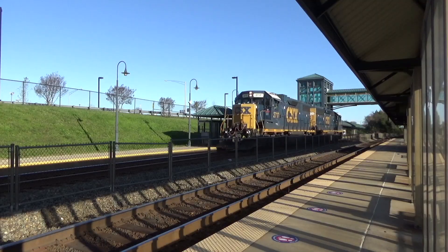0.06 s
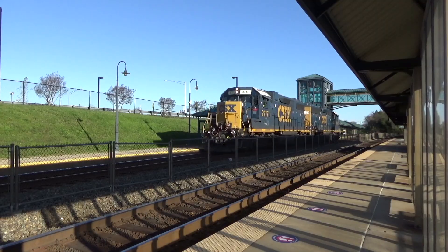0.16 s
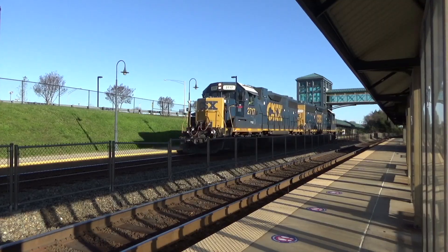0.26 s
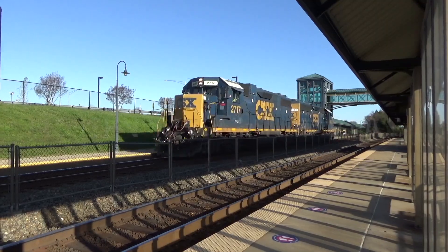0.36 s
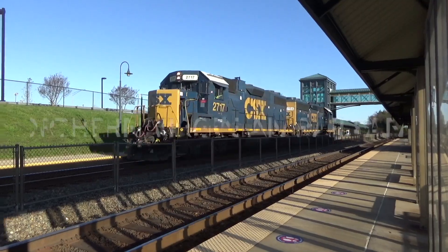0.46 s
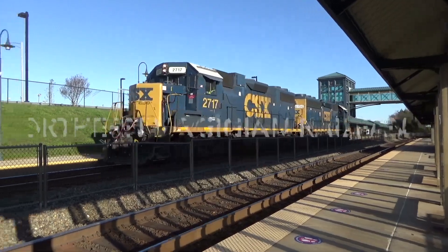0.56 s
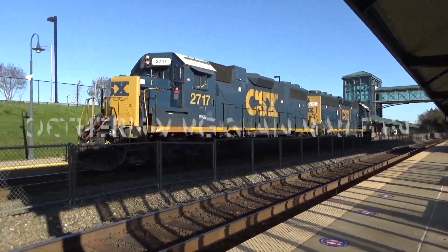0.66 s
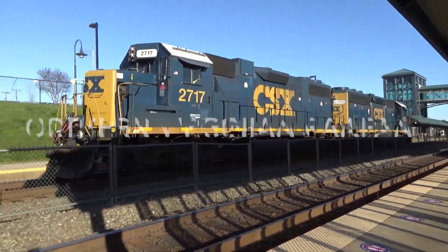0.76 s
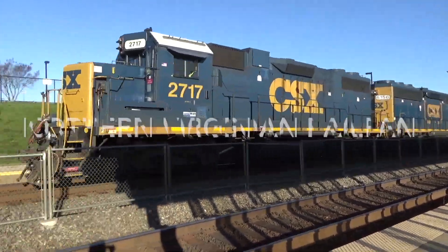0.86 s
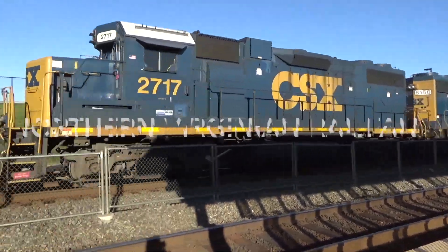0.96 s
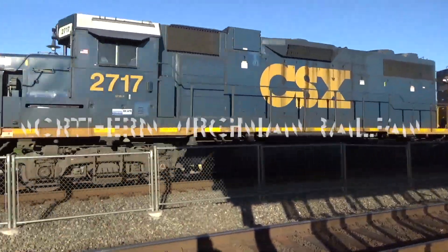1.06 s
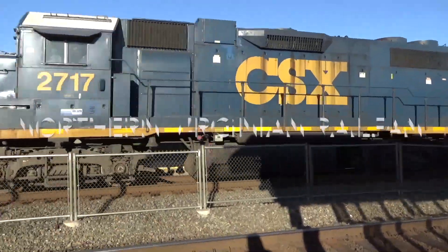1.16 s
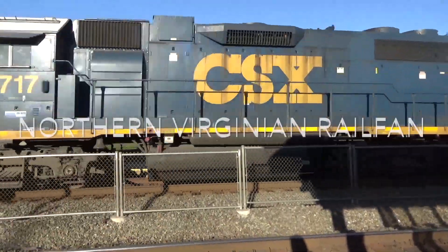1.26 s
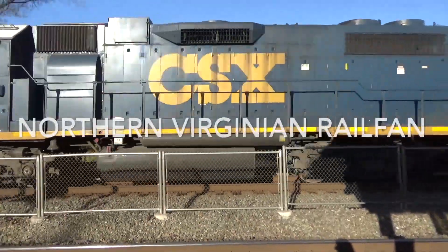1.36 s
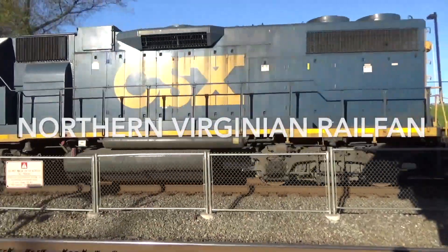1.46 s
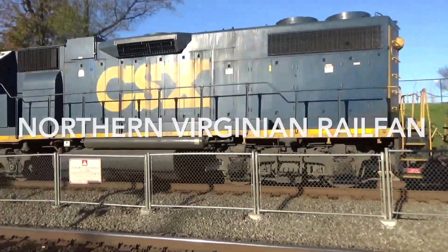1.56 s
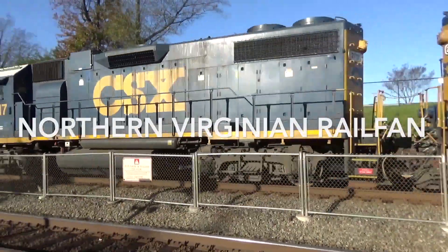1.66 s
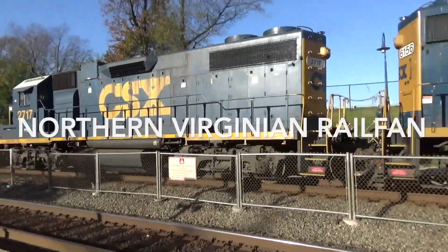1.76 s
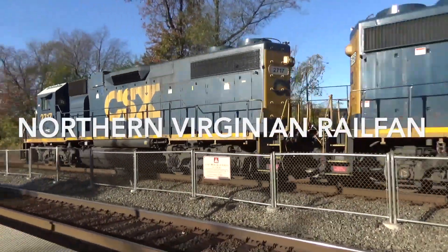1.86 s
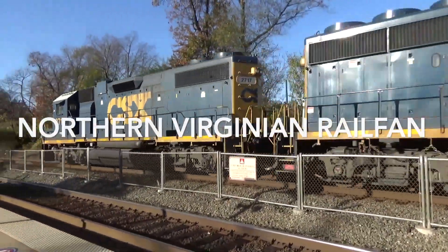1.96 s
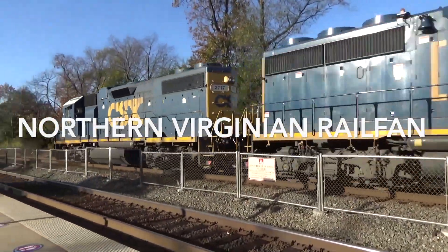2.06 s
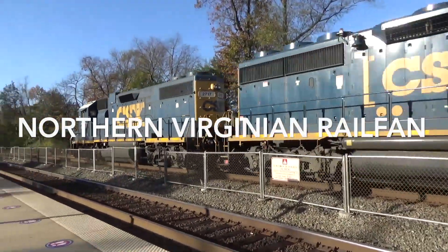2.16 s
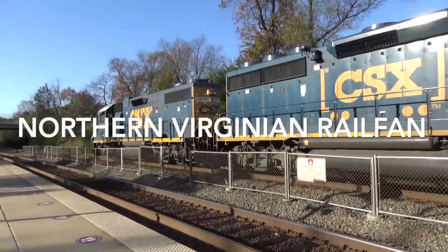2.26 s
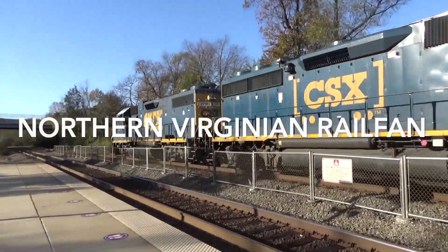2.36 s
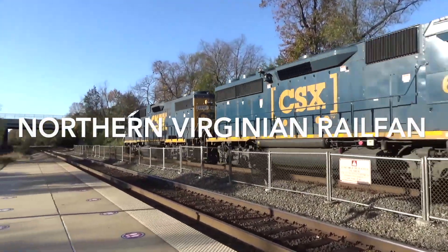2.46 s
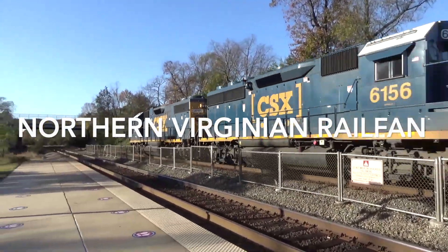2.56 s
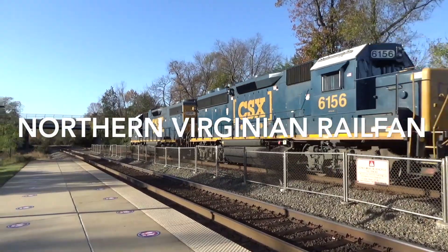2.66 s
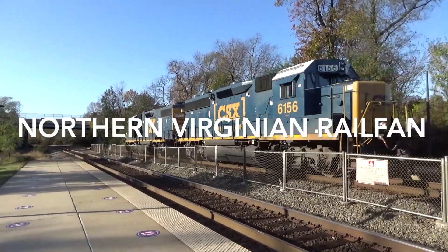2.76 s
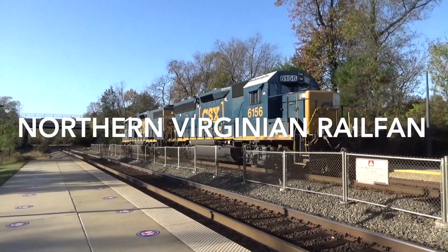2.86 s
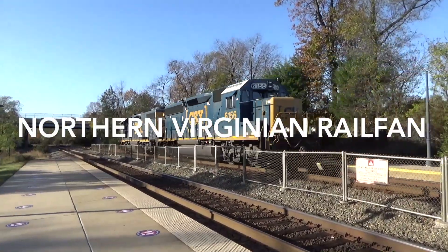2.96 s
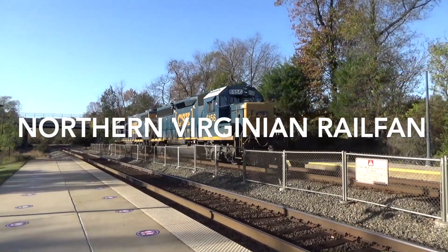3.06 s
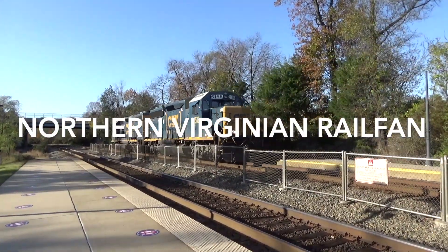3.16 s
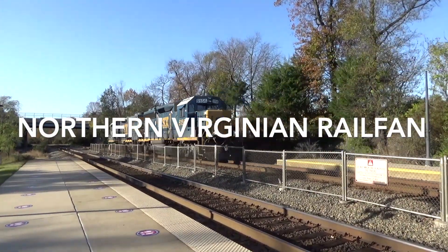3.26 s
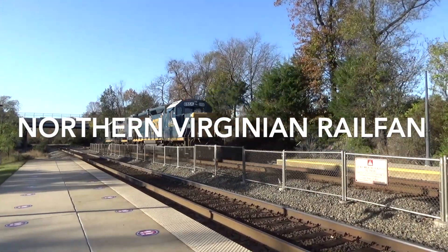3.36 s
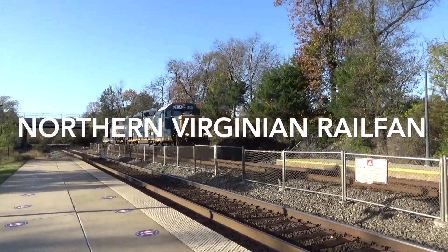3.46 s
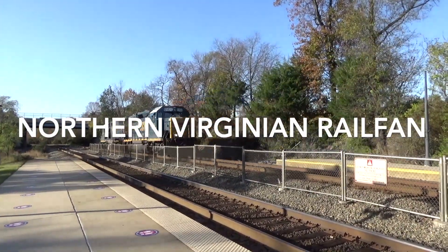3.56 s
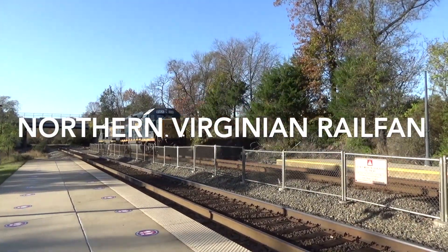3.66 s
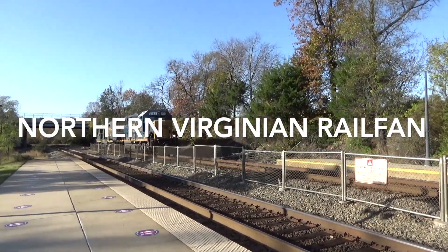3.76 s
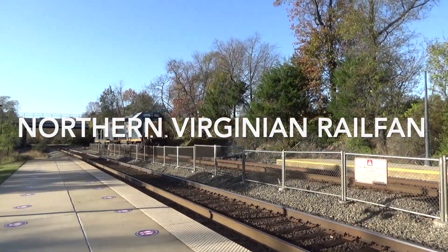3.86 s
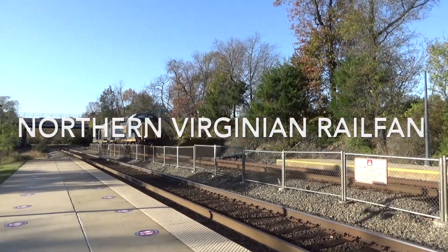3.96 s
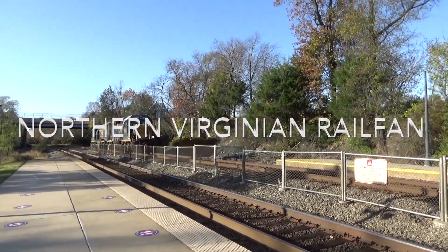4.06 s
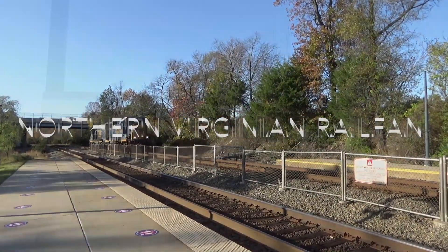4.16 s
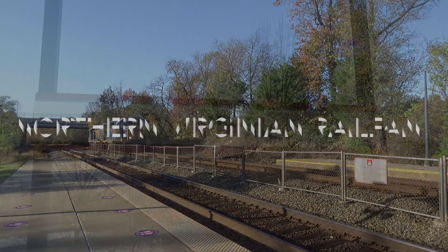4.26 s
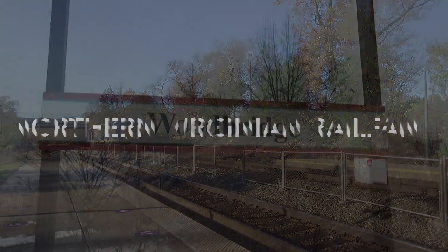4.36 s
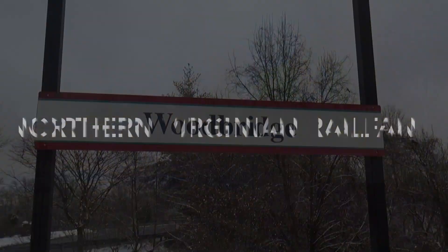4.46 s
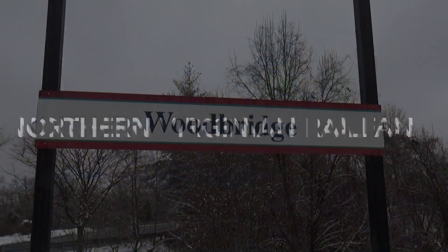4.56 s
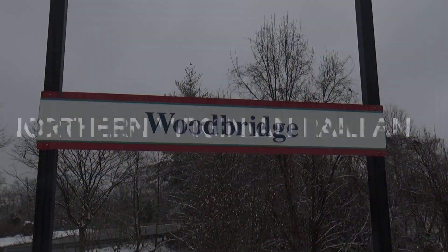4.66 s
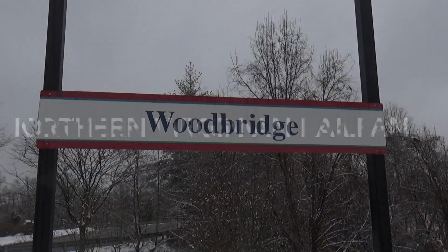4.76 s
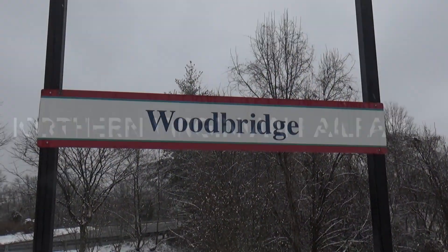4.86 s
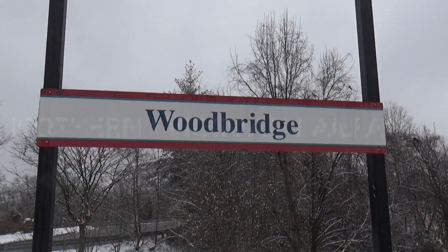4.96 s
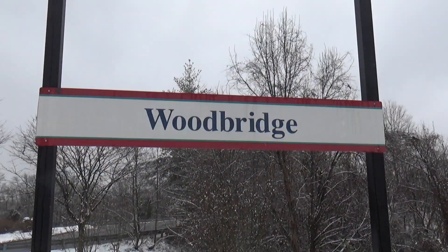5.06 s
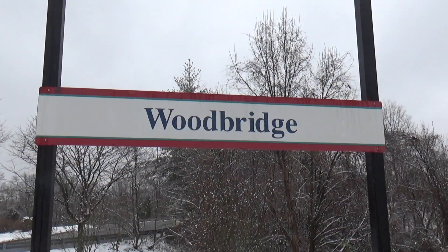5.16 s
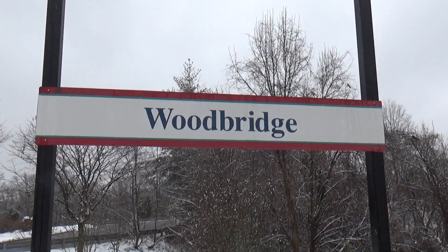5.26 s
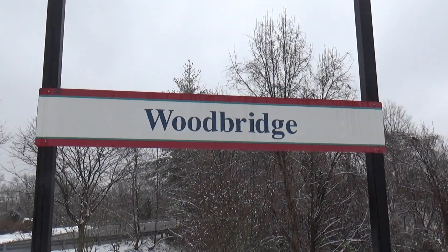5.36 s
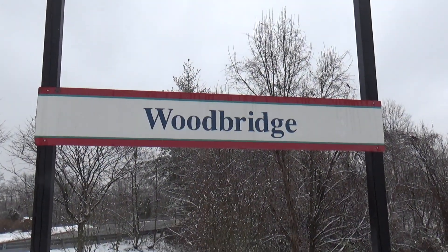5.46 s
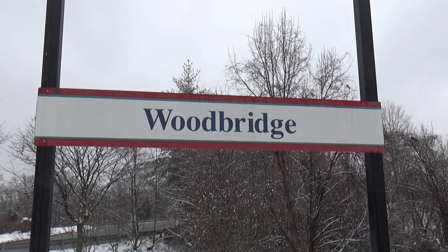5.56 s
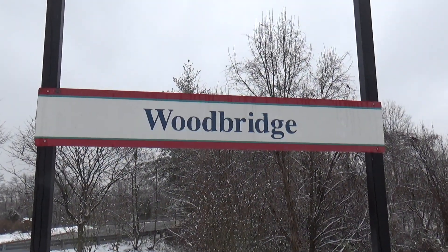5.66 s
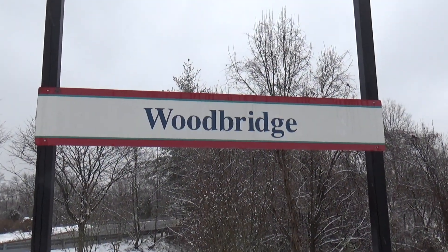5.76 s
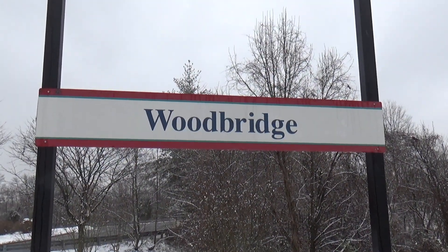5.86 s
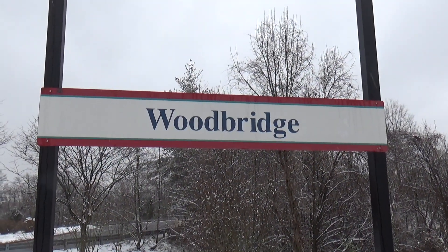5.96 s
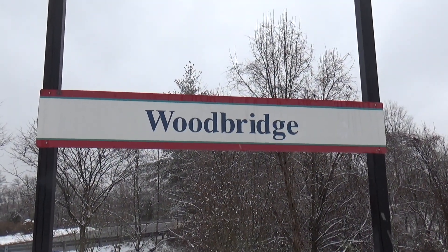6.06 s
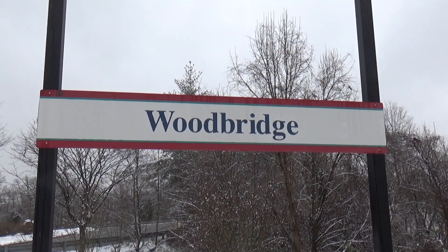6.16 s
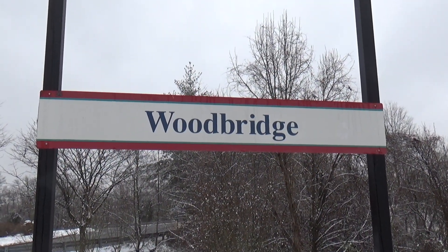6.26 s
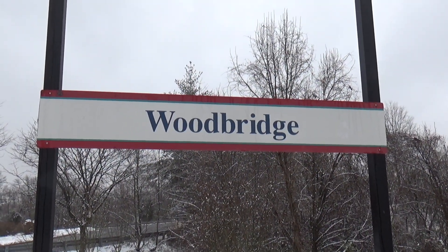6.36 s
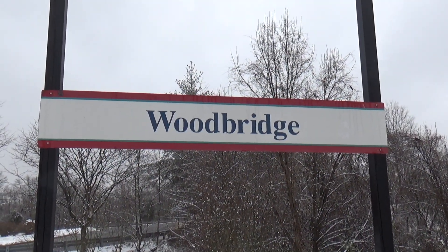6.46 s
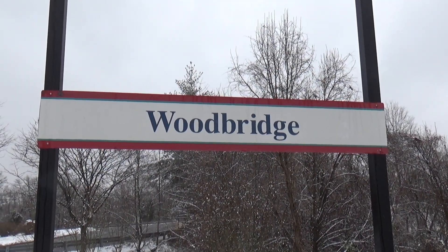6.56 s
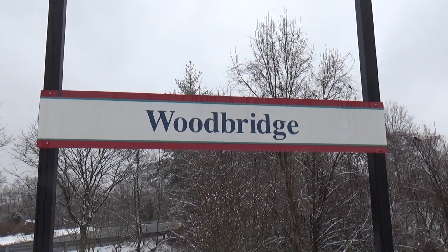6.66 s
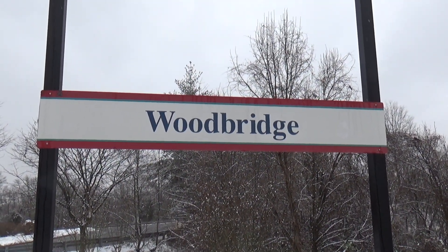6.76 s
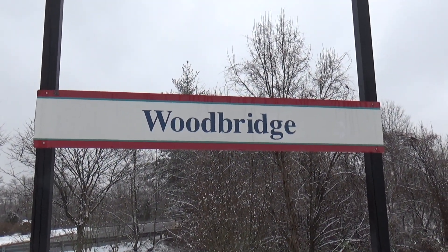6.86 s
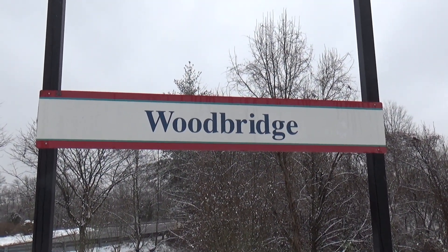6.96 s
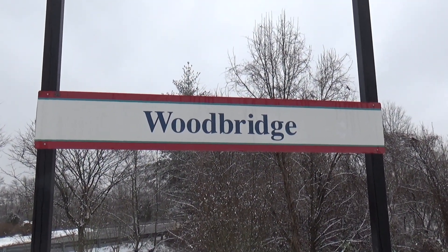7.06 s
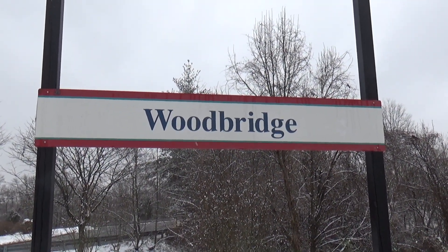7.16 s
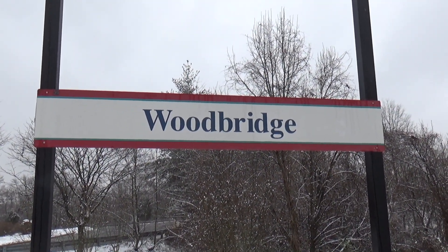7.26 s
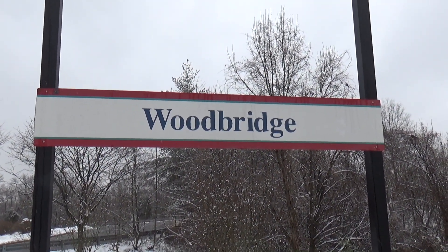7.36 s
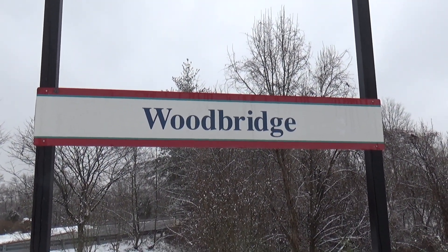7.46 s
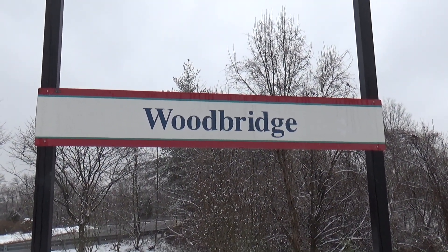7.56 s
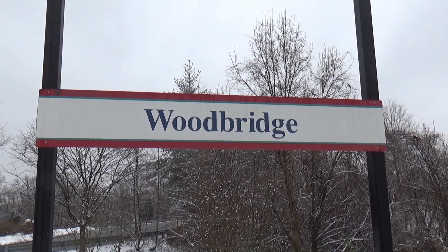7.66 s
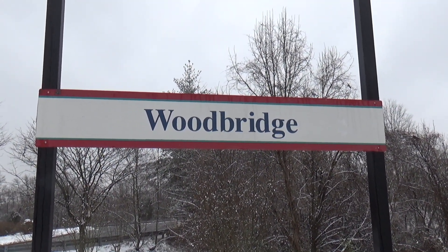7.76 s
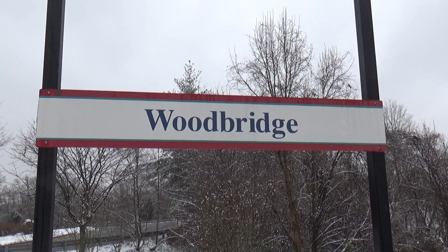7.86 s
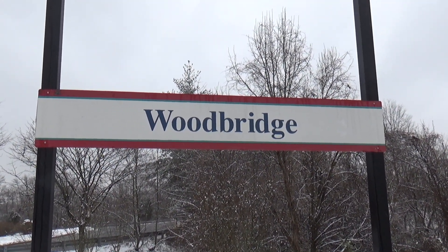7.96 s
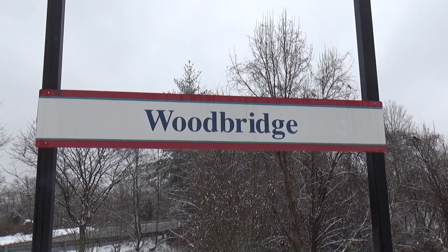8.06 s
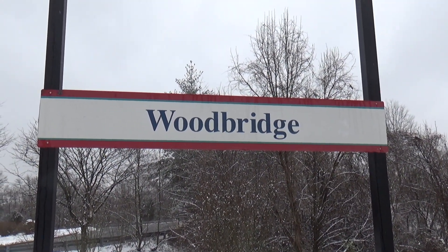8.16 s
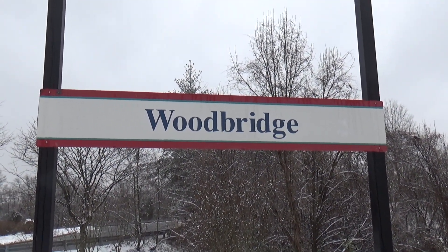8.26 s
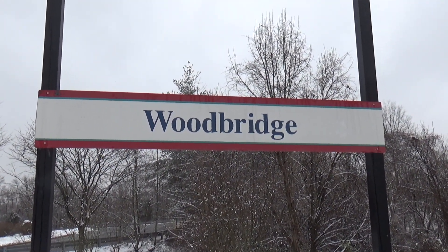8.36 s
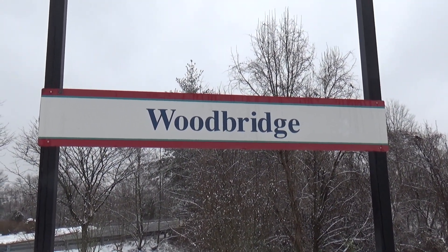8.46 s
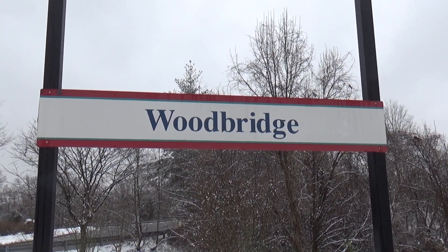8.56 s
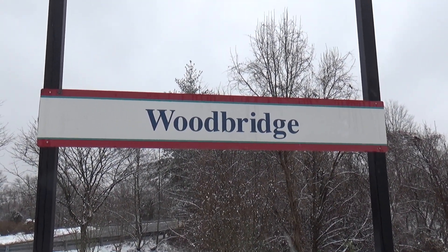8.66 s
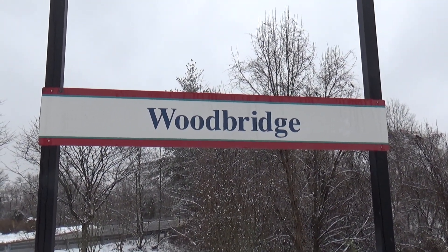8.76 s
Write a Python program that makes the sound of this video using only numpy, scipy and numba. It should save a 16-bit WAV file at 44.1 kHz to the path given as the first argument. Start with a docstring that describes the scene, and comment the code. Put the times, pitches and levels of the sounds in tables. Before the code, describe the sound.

A loud train pass with ringing bell and rapid wheel thumps fades into a calm winter platform, distant vehicle and sharp icy ticks.

```python
"""Train pass, then winter platform.

Diesel locomotives pass at speed: roar from noise bands, a struck bell of beating modes that drops in pitch,
flat-spot thumps from ringing noise, a casing drone of narrow noise and one puff of air.
This fades over to wet road hiss from noise bands and a distant vehicle changing gear, from engine orders.
Sleet grains, clicks with short rattling rings, tick on the microphone housing."""
import sys
import numpy as np
from scipy import signal
from scipy.fft import rfft, irfft, next_fast_len
from scipy.io import wavfile
from scipy.ndimage import uniform_filter1d
from numba import njit

SR = 44100
rng = np.random.default_rng(int(sys.argv[2]) if len(sys.argv) > 2 else 0)


def output_pcm(signal):
    """Save a mono or channel-first signal as 16-bit PCM at the path in sys.argv[1].

    Samples are clipped to [-1, 1] before scaling.
    """
    pcm = np.clip(np.atleast_2d(signal).T, -1, 1) * 32767
    wavfile.write(sys.argv[1], SR, np.round(pcm).astype(np.int16))


N = 388521
T = np.arange(N) / SR
MID_SIDE = np.array([[1], [-1]])  # sign of the side signal in left and right


def undb(db):
    """Gain of a dB value."""
    return 10 ** (np.asarray(db) / 20)


def curves(table):
    """Columns of a time table, interpolated to one value per sample."""
    s, *columns = np.transpose(table)
    return [np.interp(T, s, c) for c in columns]


def at_hz(table, hz):
    """Value of a spectrum table, interpolated over log frequency."""
    f, v = np.transpose(table)
    return np.interp(np.log(hz), np.log(f), v)


def panned(x, pan_db):
    """Two channels with a level difference, left minus right."""
    return np.array([x * undb(pan_db / 2), x * undb(-pan_db / 2)])


def filtered(x, order, hz, kind="low"):
    """Butterworth filter."""
    return signal.sosfilt(signal.butter(order, hz, kind, fs=SR, output="sos"), x)


@njit
def svf(x, hz, width_hz):
    """State-variable band-pass with a moving centre, gain 1 there."""
    y, b, l = np.empty(len(x)), 0., 0.
    for i in range(len(x)):
        g, k = np.tan(np.pi * hz[i] / SR), width_hz / hz[i]
        v = (b + g * (x[i] - l)) / (1 + g * (g + k))
        b, l, y[i] = 2 * v - b, l + 2 * g * v, k * v
    return y


def even(x, size):
    """Narrow noise with its slow chance swells levelled out; rms 1."""
    return x / np.sqrt(uniform_filter1d(x ** 2, size) + 1e-9)


def walk(rate_hz):
    """Random levels held for 1 / rate_hz and slewed; spread near 1."""
    k = int(SR / rate_hz)
    steps = np.repeat(rng.standard_normal(N // k + 1), k)
    return 1.56 * uniform_filter1d(uniform_filter1d(steps, k), k)[:N]


# Directional split of the two microphone ports. Each row: frequency in Hz, share of the level difference (0-1).
PORT_SHARE = [(80, 0.05), (250, 0.38), (600, 0.97), (1500, 0.82), (4000, 0.57), (10000, 0.044)]


def noise_bands(colour, side, lead, move_db, pan_db, widen, flicker_db, flicker_hz):
    """Half-octave spaced noise bands in mid and side, each moved by move_db(hz) and flickering alone."""
    size = next_fast_len(N)
    f = np.maximum(np.fft.rfftfreq(size, 1 / SR), 1)
    shape = undb(at_hz(colour, f))
    shape /= np.sqrt(np.mean(shape ** 2))  # mid rms near 1
    side_gain = undb(at_hz(side, f))
    pair = rfft(rng.standard_normal((2, size))) * shape * np.array([f ** 0, side_gain])
    out = np.zeros((2, N))
    for hz in 25 * 2 ** np.arange(0, 10, .5):
        # squared-cosine skirts of neighbouring bands add up to one
        skirt = np.cos(np.pi * np.clip(np.log2(f / hz), -.5, .5)) ** 2
        mid, wide = irfft(pair * skirt, size)[:, :N]
        wide = wide * undb(pan_db * widen(hz))
        gain = undb(move_db(hz) + flicker_db * walk(flicker_hz))
        lean = undb(pan_db * at_hz(PORT_SHARE, hz) / 2)
        out += [gain * lean * (mid + wide), gain / lean * (mid - wide)]
    turn = np.exp(.5j * at_hz(lead, f))
    return irfft(rfft(out, size) * [turn, 1 / turn], size)[:, :N]


# Course of the roar. Each row: time in s, level in dB before ROAR_LIFT_DB, then rumble, rail hiss, air hiss
# and top hiss in dB (their means are taken out), left minus right in dB.
ROAR_COURSE = [(0.0, -19.5, -6.5, -3, -11.5, -21, -3), (0.36, -17.5, -10.5, -4, -11, -22.5, -1),
               (0.75, -20, -9.5, -1, -6.5, -15.5, -1), (0.95, -19, -10.5, -1.5, -9, -22, -1.5),
               (1.42, -16.5, -12, -5, -11, -30, -3), (1.65, -18, -11.5, -5, -11.5, -31, -6),
               (2.2, -16.5, -14, -7, -15, -36.5, -7.5), (2.45, -19, -14.5, -3.5, -8.5, -31.5, -6.5),
               (2.71, -19.5, -11.5, -2.5, -10.5, -31, -4), (3.15, -21, -12, -2.5, -12, -27.5, -1.5),
               (3.8, -25.5, -11.5, -0.5, -11.5, -26, 0), (4.2, -25.5, -9, 0.5, -16, -25.5, 0.5),
               (4.6, -25, -8, 2, -12.5, -21, 0.5)]
# Centres of rumble, body, rail, air and top hiss. Each entry: frequency in Hz.
ROAR_ZONE_CENTRES = [170, 700, 2600, 7500, 13000]
# Mean spectrum. Each row: frequency in Hz, relative density in dB.
ROAR_SPECTRUM = [(15, -59), (25, -31), (102, -20.5), (212, -8), (394, -3), (451, -1.5), (659, -0.5),
                 (1130, -5), (1260, -8), (2550, -10.5), (3520, -14.5), (4250, -13.5), (6920, -20.5),
                 (8590, -19.5), (16000, -48.5)]
# Stereo width at zero lean. Each row: frequency in Hz, side minus mid in dB.
ROAR_WIDTH = [(60, -14), (110, -16), (200, -15.5), (380, -11.5), (700, -8.5), (1290, -9.5), (2380, -15),
              (4400, -42), (8120, -22.5), (11000, -40), (15000, -66)]
# Narrowing with direction. Each row: frequency in Hz, dB less side per dB of left minus right.
ROAR_NARROWING = [(400, 0), (1000, 0.5), (2000, 0.7), (4000, 3.5), (8000, 2.5), (12000, -4)]
# Phase between the ports. Each row: frequency in Hz, lead of the left in radians.
ROAR_PHASE = [(30, 0.0), (100, -0.25), (250, -0.46), (500, -0.36), (1000, -0.33), (2000, -0.1),
              (4000, 0.16)]
# Throb of the roar at the wheel-turn rate. Each row: time in s, depth in dB before its share.
THROB_DEPTH = [(2.2, 0.2), (2.9, 0.52), (3.5, 2.2), (4.0, 1.2), (4.6, .2)]
# Throb over the spectrum. Each row: frequency in Hz, share of the depth (0-1).
THROB_SPECTRUM = [(300, 0.05), (1500, 0.64), (5000, 0.54), (12000, 1)]
# Brief dip over the spectrum. Each row: frequency in Hz, share of DIP_DB (0-1).
DIP_SPECTRUM = [(400, 0.58), (1500, 1), (3200, .7), (7000, 0.59)]
DIP_FROM_S, DIP_TO_S, DIP_DB = .752, 0.826, -3.5  # under the nearest bell stroke
TURN_S, HIT_S, THROB_LAG_S = .1408, 3.710, 0.039  # wheel turn, one hit, hit to throb crest
ROAR_LIFT_DB = 2.0


def roar():
    """Wheels, rails, fans and exhaust: one wide roar that dulls just after passing, then brightens as it fades."""
    db, rumble, rail, air, top, pan_db = curves(ROAR_COURSE)
    zones = np.array([rumble, 0 * db, rail, air, top])
    zones -= zones[:, :3 * SR].mean(axis=1, keepdims=True)  # over 3 s; the spectrum holds the mean balance
    throb_db = curves(THROB_DEPTH)[0] * np.cos(2 * np.pi * (T - HIT_S - THROB_LAG_S) / TURN_S)
    dip_db = DIP_DB * uniform_filter1d(1. * (T > DIP_FROM_S) * (T < DIP_TO_S), size=600)

    def move_db(hz):
        share = [np.interp(np.log(hz), np.log(ROAR_ZONE_CENTRES), one) for one in np.eye(len(zones))]
        pulse_db = at_hz(THROB_SPECTRUM, hz) * throb_db
        return np.dot(share, zones) + pulse_db + at_hz(DIP_SPECTRUM, hz) * dip_db

    bands = noise_bands(ROAR_SPECTRUM, ROAR_WIDTH, ROAR_PHASE, move_db, pan_db,
                        lambda hz: -at_hz(ROAR_NARROWING, hz), flicker_db=1.1, flicker_hz=9.)
    return bands * undb(db + ROAR_LIFT_DB)


SPEED_M_S, GAP_M, ABREAST_S = 23., 9.8, 1.27  # train speed, distance to track, time abreast


def doppler():
    """Pitch ratio of a point on the train passing at steady speed; sound at 343 m/s."""
    along_m = SPEED_M_S * (T - ABREAST_S)
    return 1 / (1 + SPEED_M_S / 343 * along_m / np.hypot(along_m, GAP_M))


# Bell at rest, each mode a close pair that beats. Each row: frequency in Hz, level in dB, t60 in s,
# swell time constant in s, beat in Hz, time from blow to beat crest in s, beat depth (0-1).
BELL_MODES = [(1108, 9.5, 1.9, 0.13, 2.8, .18, .35), (2150, 8.5, 0.58, 0.018, 17., 0.037, .35),
              (2412, 4.5, 1.05, 0.03, 22, 0.0595, 0.55), (4040, 5.5, 0.63, 0.015, 18, 0.039, 0.2),
              (6060, 3, 0.53, 0.005, 25, 0.019, 0.27), (8030, -1, 0.5, 0.0033, 25., 0.011, 0.45)]
# Bell strokes. Each row: time in s, level in dB, dB per octave above the strike note,
# extra dB of the hum note below it, extra dB of the top modes.
BELL_STROKES = [(-.2, -19, -3, -10, 0), (.748, -21.5, 0, 0, 0), (1.672, -28.5, 5, 2, -10),
                (2.64, -29.5, -2.5, -3, 2), (3.6, -38, -2, -1, 3), (4.568, -24, -50, -9, 3)]
STRIKE_HZ, BELL_TOP_HZ = 2150, 5000


def bell(ratio):
    """Each stroke rings decaying, beating modes, shifted by the Doppler ratio."""
    out, turns = np.zeros(N), np.cumsum(ratio) / SR
    for hz, db, t60, swell, beat, crest, depth in BELL_MODES:
        ring = np.zeros(N)
        octaves = np.log2(max(hz / STRIKE_HZ, 1))
        for s, stroke_db, tilt_db, hum_db, top_db in BELL_STROKES:
            i = max(int(s * SR), 0)
            age = T[i:i + SR] - s
            pair = 1 + depth * np.cos(2 * np.pi * beat * (age - crest))
            level_db = stroke_db + db + tilt_db * octaves
            level_db += hum_db * (hz < STRIKE_HZ - 500) + top_db * (hz > BELL_TOP_HZ)
            rise = 1 - np.exp(-np.abs(age) / swell)
            ring[i:i + SR] += pair * undb(level_db - 60 * age / t60) * rise
        # reflections from ground and car body make every mode waver
        waver = undb(min(hz / 2500, 1.5) * walk(70.))
        out += ring * waver * np.sin(2 * np.pi * hz * turns + hz / 6000 * walk(160.))
    return out


# Flat-spot hits, one a wheel turn. Each row: time in s, level in dB, scrape in dB against that level,
# pitch of the ring as a ratio, extra dB of the upper ring.
FLAT_SPOT_HITS = [(2.161, -31, -17, 1., 2), (2.302, -18, -18, 1., -2), (2.443, -23, -19, 1., 0),
                  (2.584, -12, -22, 1., 2), (2.724, -11, -20, 0.97, 3), (2.865, -9.5, -15, 0.88, 4),
                  (3.006, -14, -13, 1.1, 7), (3.147, -12, -12, 0.97, 9), (3.288, -10, -11.5, 1.07, 4.5),
                  (3.422, -10.5, -7.5, 0.94, 6), (3.571, -8, -18, 1.02, -2), (3.708, -6.5, -11, 1.02, -5),
                  (3.847, -8, -18, 1.015, -7), (3.990, -8, -17, 1.02, -8), (4.132, -9.5, -22, 0.92, -9),
                  (4.273, -9.5, -18, 1.05, -3), (4.414, -11, -22, 0.92, -9), (4.555, -14, -21, 1, -6)]
# Wheel and rail ring. Each row: frequency in Hz, width in Hz, level in dB,
# delay in s (the peak comes 0.021 s after it), later return in dB.
WHEEL_MODES = [(606, 170, -0.5, 0.021, -7.5), (1042, 120, 2.5, 0.0085, -4.5),
               (2500, 1100, -5.5, 0.023, -20)]
THUMP_RISE_S, THUMP_FALL_S, RING_DB, SCRAPE_TOP_DB = 0.0098, 0.011, -8.5, -31
THUMP_SIDE_DB, THUMP_SIDE_HZ, THUMP_LEFT_DB = -9, 2000, -2


def thumps():
    """Each contact swells fast in every wheel mode, returns from the embankment and lifts a wide-band scrape."""
    age = np.arange(int(.2 * SR)) / SR
    times, hit_db = np.transpose(FLAT_SPOT_HITS)[:2]
    _, scrape_db, pitch, upper_db = curves(FLAT_SPOT_HITS)

    def blows(lag, return_db):
        shape = np.zeros(len(age))
        for at, db in [(lag + 0.021, 0), (lag + 0.067, return_db)]:
            slope = np.where(age < at, (age - at) / THUMP_RISE_S, (at - age) / THUMP_FALL_S)
            shape += undb(db) * np.exp(slope)
        out = np.zeros(N)
        for s, level_db in zip(times - .02, hit_db):  # the swell starts just before full contact
            i = int(s * SR)
            out[i:i + len(age)] += undb(level_db) * shape
        return out

    def ringing(hz, width_hz):
        return even(svf(rng.standard_normal(N), hz * pitch, 1. * width_hz), size=300)

    ring = np.zeros((2, N))
    for hz, width_hz, db, lag, return_db in WHEEL_MODES:
        # each knock rings wide below THUMP_SIDE_HZ
        side = undb(THUMP_SIDE_DB) * filtered(ringing(hz, width_hz), 3, THUMP_SIDE_HZ) * MID_SIDE
        level = undb(db + upper_db * (hz == WHEEL_MODES[-1][0]))
        ring += level * blows(lag, return_db) * (ringing(hz, width_hz) + side)
    ring = undb(RING_DB) * filtered(ring, 2, 5500)

    hiss = filtered(rng.standard_normal(N), 3, [1800, 9800], "band")
    edge = filtered(rng.standard_normal(N), 3, [8000, 9900], "band")
    scrape = undb(scrape_db) * uniform_filter1d(blows(0.019, -20.0), size=900) * hiss
    scrape_top = undb(SCRAPE_TOP_DB) * uniform_filter1d(blows(0.015, -18.0), size=900) * edge
    return ring + scrape + scrape_top


# Hollow drone of the engine casing. Each row: time in s, level in dB.
DRONE_COURSE = [(0, -26.5), (.35, -24.5), (.6, -33), (.9, -32), (1.15, -26), (1.4, -28), (1.9, -30.5),
                (2.6, -37.5), (3.2, -43)]
DRONE_HZ, DRONE_WIDTH_HZ = 452, 28  # at rest, per filter pass


def drone(ratio):
    """Engine noise rings one narrow resonance of the casing."""
    noise = rng.standard_normal(N)
    for _ in range(2):
        noise = svf(noise, DRONE_HZ * ratio, 1. * DRONE_WIDTH_HZ)
    return even(noise, size=4000) * undb(curves(DRONE_COURSE)[0])


PUFF_S, PUFF_HALF_S, PUFF_DB, PUFF_HZ, PUFF_WIDTH_HZ = .243, .014, -31, 8800, 2500


def puff():
    """One short hiss of compressed air: band-passed noise under a bell-shaped swell."""
    noise = rng.standard_normal(N)
    for _ in range(2):
        noise = svf(noise, np.full(N, 1. * PUFF_HZ), 1. * PUFF_WIDTH_HZ)
    swell = np.exp(-((T - PUFF_S) / PUFF_HALF_S) ** 2)
    return undb(PUFF_DB) * swell * noise * np.sqrt(2 * SR / PUFF_WIDTH_HZ)


# Loudest sleet grains. Each row: time in s, level in dB before the housing, ring in Hz, t60 in s,
# left minus right in dB, extra treble in dB.
LOUD_GRAINS = [(4.6334, -20.5, 8300, 0.004, 2, 1), (4.9899, -19.5, 4600, 0.004, -0.5, -1),
               (5.0651, -14.5, 5100, 0.015, 2, -3), (5.0772, -20, 8800, 0.005, -0.5, 2),
               (5.2615, -24, 8980, .004, 0, 0), (5.29, -14.5, 6000, 0.003, 5, -6),
               (5.403, -17.5, 6500, 0.003, 3, 3), (5.4426, -11.5, 6200, 0.005, 7, -14),
               (5.4925, -15, 4500, 0.012, -2, 6.5), (5.576, -18, 6300, 0.004, 5.5, -10),
               (5.7693, -24, 6000, 0.004, 0, 0), (6.0442, -26, 8000, 0.004, 0, 0),
               (6.1465, -16.5, 7100, 0.003, -0.5, -4), (6.2555, -26, 7870, 0.007, 0.0, 1),
               (6.3134, -23, 6500, 0.004, -0.5, -1), (6.6952, -28, 7800, 0.003, 4, 2),
               (6.7299, -20, 4380, 0.005, 3, -5), (6.8245, -21, 6000, 0.003, -1.0, -2),
               (7.0731, -25, 8100, 0.0033, 0.0, 0), (7.1169, -24, 8790, 0.003, 1.0, 0),
               (7.4173, -20, 5800, 0.0036, -0.5, -18), (7.4256, -20, 4000, 0.0039, -0.5, -15),
               (7.67, -18.5, 4300, 0.006, -0.5, -8), (7.7415, -25, 7340, 0.003, 0.5, 0),
               (8.0122, -26, 4600, 0.004, 0, -7), (8.0602, -18.5, 9500, 0.003, 2, 3),
               (8.089, -22, 7900, 0.003, 2, 0), (8.178, -27, 8000, 0.003, 0, 0),
               (8.3146, -17.5, 4200, 0.006, 4, -7), (8.3255, -21, 8000, 0.003, 0.5, 0),
               (8.6684, -21, 7500, 0.005, 1, 0)]
PATTER_DB, PATTER_SPREAD_DB, PATTER_T60_S = -38, 5, 0.0043
GRAIN_BODY_DB, GRAIN_TREBLE_HZ = -9, 8500  # dull knock against the click; treble corner
HOUSING_HZ, HOUSING_WIDTH_HZ = 9100, 2200


def sleet():
    """Loud grains and a patter of faint ones; each is one sharp click with a short rattling ring."""
    chance = rng.random((150, 4))
    faint = np.column_stack([
        4.6 + 4.2 * chance[:, 0],
        PATTER_DB - PATTER_SPREAD_DB * np.log(chance[:, 1] + 0.054),
        6000 + 4500 * chance[:, 2],
        np.full(len(chance), PATTER_T60_S),
        5.6 * (chance[:, 3] - .5),
        np.zeros(len(chance))])
    grains = np.vstack([LOUD_GRAINS, faint])
    age = np.arange(900) / SR - .0008
    knock = np.cos(2 * np.pi * 3000 * age) * np.exp(-(age / 0.000085) ** 2)
    click = -np.exp(-(age / .00003) ** 2) - undb(GRAIN_BODY_DB) * knock
    attack = np.clip(1 + age / 0.00027, 0, 1)
    treble = signal.butter(3, GRAIN_TREBLE_HZ, "high", fs=SR, output="sos")
    out = np.zeros((2, N + len(age)))
    for s, db, hz, t60, pan_db, treble_db in grains:
        mid, side = rng.standard_normal((2, len(age)))
        crack = mid + 0.25 * side * MID_SIDE
        rattle = 0.3 * np.sin(2 * np.pi * hz * age) + 0.43 * crack
        grain = click + rattle * undb(-60 * np.abs(age) / t60) * attack
        grain = grain + (undb(treble_db) - 1) * signal.sosfiltfilt(treble, grain)
        i = int(s * SR)
        out[:, i:i + len(age)] += grain * panned(np.ones(1), pan_db) * undb(db)
    # the housing passes the upper middle and rings near its own resonance
    return np.array([svf(c, np.full(N, 6500.), 10000.0)
                     + 0.77 * svf(c, np.full(N, HOUSING_HZ), HOUSING_WIDTH_HZ) for c in out[:, :N]])


# Vehicle pulls up a gear, eases off, shifts, pulls again. Each row: time in s, firing rate in Hz,
# level in dB, extra dB of the overtones.
VEHICLE_COURSE = [(4.65, 104, -64, 0), (4.83, 103.2, -56, -5), (5.05, 111.4, -55, 3), (5.41, 124, -50.5, 4),
                  (5.57, 124.6, -59, 2), (5.75, 121, -56, 1), (6.14, 105.8, -56.5, -1), (6.28, 97, -63, -2),
                  (6.45, 79.3, -63, 8), (6.7, 84.4, -60, 9), (7.42, 93, -59, 4), (8.81, 116, -55, -2)]
# Engine orders. Each row: multiple of the firing rate, level in dB.
ENGINE_ORDERS = [(1, 0), (2, -12), (3, -14.5), (4, -22)]
EXHAUST_HZ, EXHAUST_WIDTH_HZ, EXHAUST_DB = 241, 67, 4.5


def vehicle():
    """Engine orders waver on their way through the air; a pipe resonance lifts those that cross it."""
    hz, db, over_db = curves(VEHICLE_COURSE)
    turns = np.cumsum(hz) / SR
    out = np.zeros(N)
    for k, order_db in ENGINE_ORDERS:
        pipe_db = EXHAUST_DB * np.exp(-((k * hz - EXHAUST_HZ) / EXHAUST_WIDTH_HZ) ** 2)
        waver_db = (1. + .05 * k) * walk(9.)
        gain = undb(db + order_db + (k > 1) * over_db + pipe_db + waver_db)
        out += gain * np.sqrt(2) * np.sin(2 * np.pi * k * turns)
    return out


# Road hiss. Each row: time in s, level in dB before ROAD_LIFT_DB.
ROAD_COURSE = [(4.8, -42), (5.27, -41), (6.76, -42.5), (7.07, -41.5), (7.56, -42), (8.19, -41.5),
               (8.81, -42)]
# Road spectrum. Each row: frequency in Hz, relative density in dB.
ROAD_SPECTRUM = [(15, -52), (30, -32), (60, -14), (100, -4.5), (170, -10.5), (250, -5), (400, -7),
                 (800, 1.5), (1300, -0.5), (2200, -2), (4000, -6), (7300, -14), (9500, -17.5),
                 (12000, -28.5), (16000, -39)]
# Stereo width. Each row: frequency in Hz, side minus mid in dB.
ROAD_WIDTH = [(60, -37), (110, -38), (200, -38), (380, -18), (700, -12), (1290, -6), (2380, -4), (4400, -7),
              (8120, -8), (11000, -24), (15000, -37)]
# Phase between the ports. Each row: frequency in Hz, lead of the left in radians.
ROAD_PHASE = [(100, 0.01), (500, -0.23), (1000, -.3), (2000, -.12), (4000, 0.04)]
ROAD_LEAN_DB, ROAD_LIFT_DB = 1.1, 0.5  # lean is left minus right, before the port share


def road():
    """Wet road hiss: steady wide noise whose level drifts slightly at random."""
    drift_db = 0.2 * walk(1.59)
    bands = noise_bands(ROAD_SPECTRUM, ROAD_WIDTH, ROAD_PHASE, lambda hz: drift_db, ROAD_LEAN_DB,
                        lambda hz: 0, flicker_db=0.72, flicker_hz=9.)
    return bands * undb(curves(ROAD_COURSE)[0] + ROAD_LIFT_DB)


FADE_OUT_FROM_S, FADE_OUT_TO_S, FADE_OUT_POWER = 4.15, 5.03, 1.91
FADE_IN_FROM_S, FADE_IN_TO_S = 4.54, 4.94


def scene():
    """The passing train, then the fade to the winter platform."""
    pan_db = 0.49 * curves(ROAR_COURSE)[-1]
    ratio = doppler()
    train = roar() + panned(bell(ratio) + drone(ratio) + puff(), pan_db)
    train += thumps() * panned(1, pan_db + THUMP_LEFT_DB)
    fade_out = np.clip((FADE_OUT_TO_S - T) / (FADE_OUT_TO_S - FADE_OUT_FROM_S), 0, 1) ** FADE_OUT_POWER
    fade_in = np.clip((T - FADE_IN_FROM_S) / (FADE_IN_TO_S - FADE_IN_FROM_S), 0, 1)
    return fade_out * train + fade_in * (road() + vehicle()) + sleet()


TOP_HZ = 16300


def record(dry):
    """The recorder rounds the loudest peaks and cuts the top."""
    rounded = np.tanh(.6 * dry) / .6
    return signal.sosfilt(signal.ellip(10, .2, 70, TOP_HZ, fs=SR, output="sos"), rounded)


dry = scene()
out = record(dry)
output_pcm(out)
```